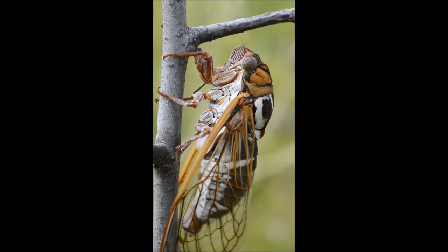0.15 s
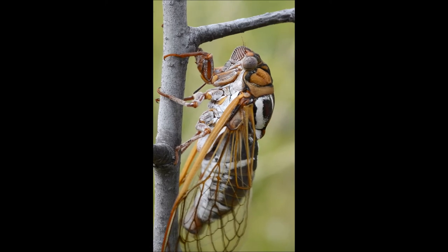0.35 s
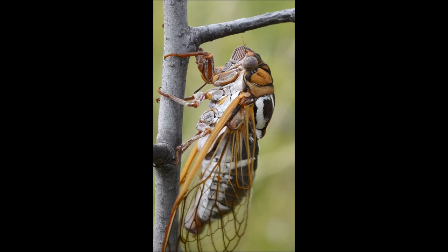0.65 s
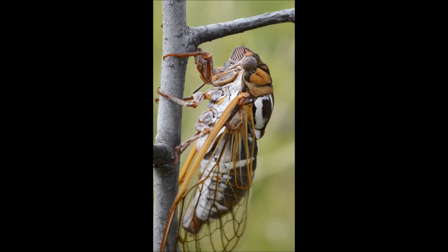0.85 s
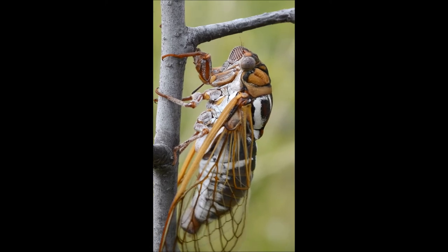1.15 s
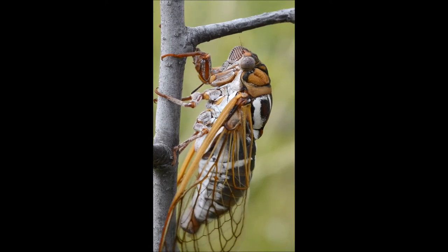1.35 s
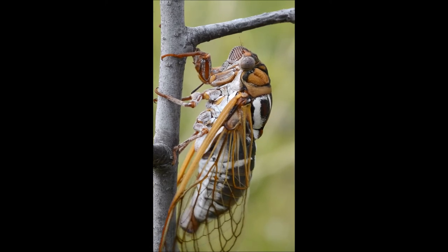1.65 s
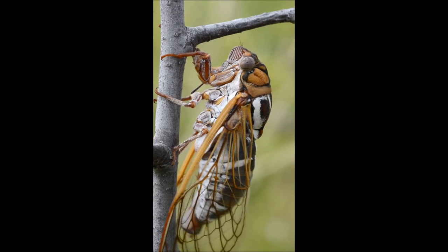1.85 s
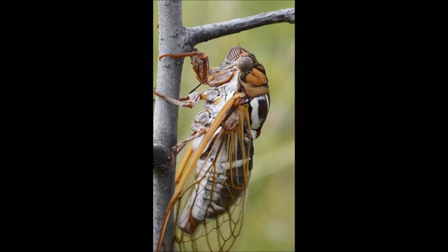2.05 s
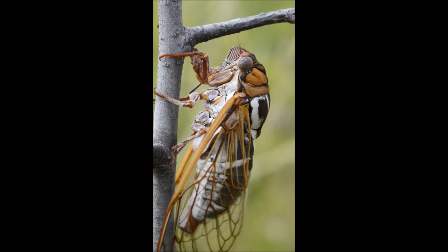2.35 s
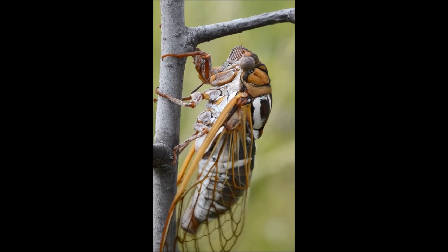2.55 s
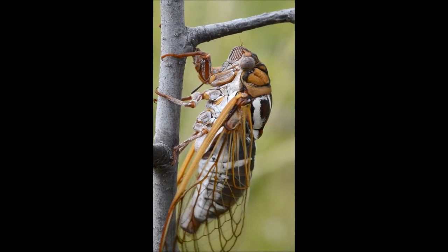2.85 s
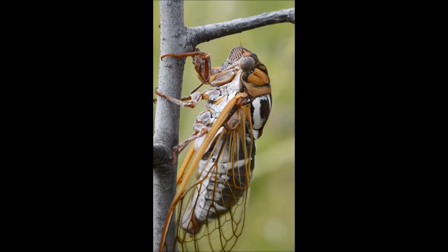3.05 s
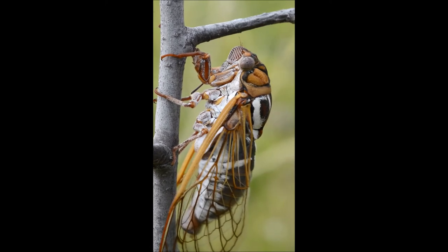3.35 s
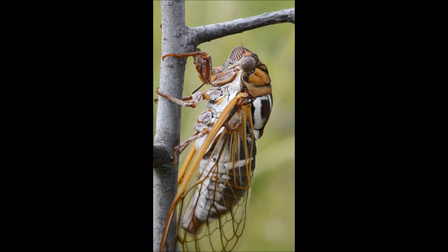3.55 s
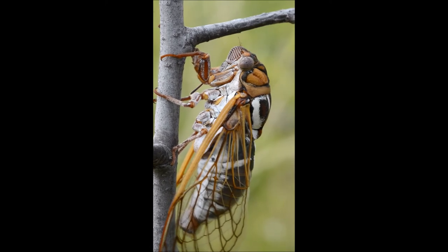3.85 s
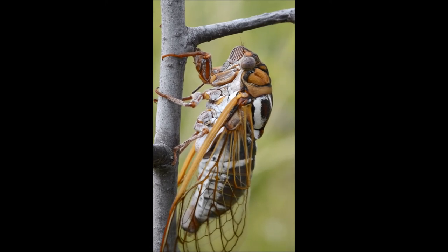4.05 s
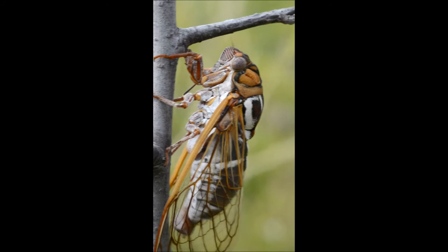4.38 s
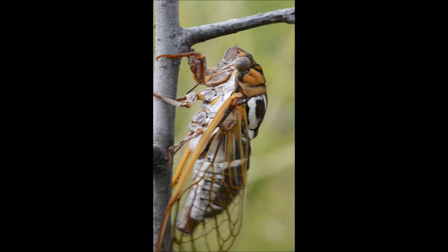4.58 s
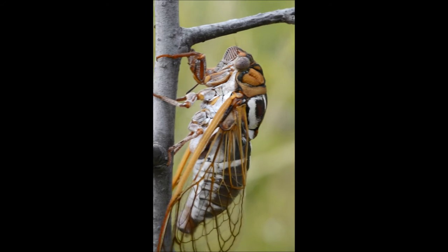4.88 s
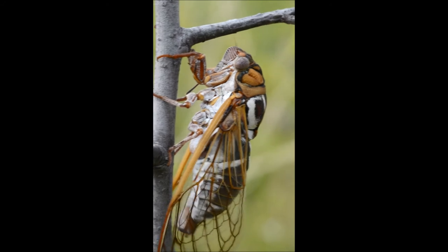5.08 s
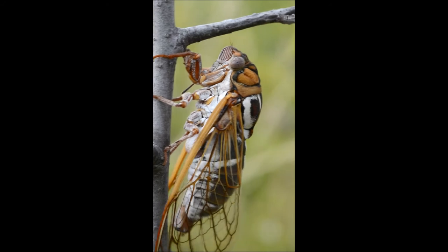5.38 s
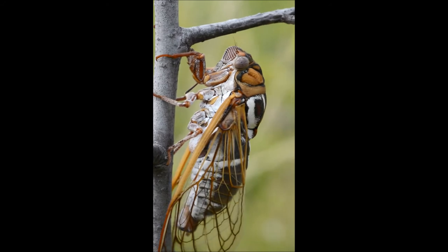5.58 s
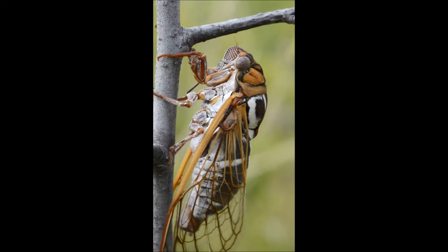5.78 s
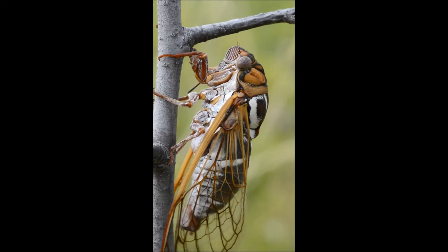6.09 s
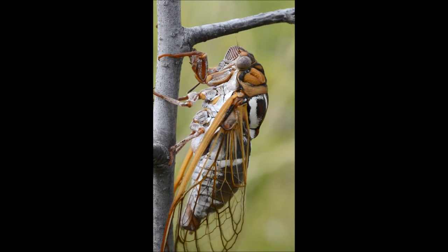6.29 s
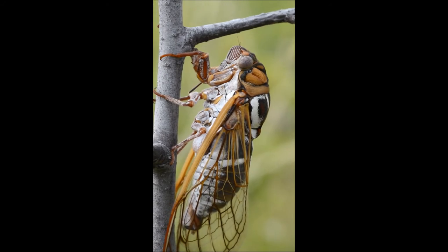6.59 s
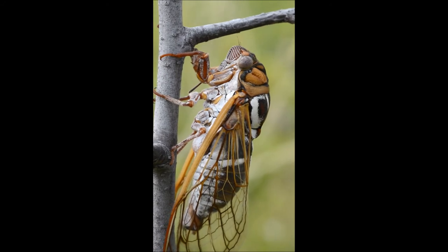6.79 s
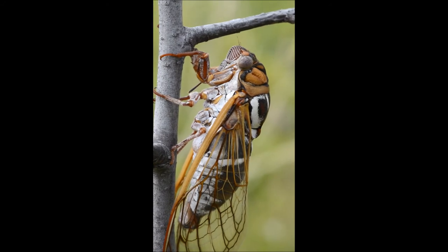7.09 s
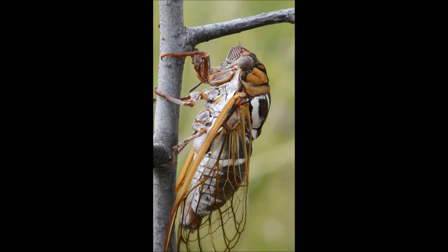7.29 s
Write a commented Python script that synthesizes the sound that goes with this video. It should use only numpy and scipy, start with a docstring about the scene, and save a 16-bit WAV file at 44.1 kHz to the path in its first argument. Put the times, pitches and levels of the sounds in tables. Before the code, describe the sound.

From the first instant a cicada very near the microphone, a little left of centre, sings a loud, piercing, dry buzz of dense tiny clicks, brightest around four to eight kilohertz with crisp snaps above. It throbs about sixteen or seventeen times a second, each pulse harder, louder and mostly higher, some snaps slightly overloaded. This holds almost unchanged until about 4.9 seconds. From 5 to 6 seconds the throbs weaken and disappear, leaving a more even, lower-energy buzz. From 6 to 6.9 seconds it slows, softens and grows looser and raspier, then stops suddenly, followed by two loose clicks at about 6.9 seconds. A second cicada, fainter and hissier, throbs steadily farther off throughout and is now exposed until the end. Leaves give a very short diffuse scatter; the still air is nearly silent, with a faint low hum and one tiny soft blip near 7.4 seconds.

```python
"""A loud, throbbing buzz is heard first: a cicada on a twig close by; a second one throbs farther off.
The near one's two ribbed tymbals (drum skins) buckle in turn, three clicks each. Its abdomen lifts about
16 times a second, which slows the stroke and makes the clicks louder and mostly higher.
Then the throbs die out, the muscles tire, and the song stops with two loose clicks.
The far one is a filtered train of uneven clicks with noise; leaves scatter the sound, over still air."""
import sys
import numpy as np
from scipy import signal
from scipy.io import wavfile

SR = 44100
rng = np.random.default_rng(int(sys.argv[2]) if len(sys.argv) > 2 else 0)


def dump_mix(stems):
    """Bounce the given channels to the path in sys.argv[1] as a 16-bit WAV at rate SR."""
    frames = np.atleast_2d(stems).T  # one column per channel
    limited = np.clip(frames, -1, 1)  # hard clip at full scale
    pcm = np.round(limited * 32767).astype(np.int16)
    wavfile.write(sys.argv[1], SR, pcm)


N = 327663
TIME = np.arange(N) / SR  # seconds


def gain_of(db):
    """Turns decibels into a gain."""
    return 10 ** (np.asarray(db) / 20)


def evened(x):
    """Scales a sound to an average (rms) strength of 1."""
    return x / np.sqrt(np.mean(x ** 2) + 1e-20)


def add(mix, start_s, sound):
    """Mixes a sound in at start_s, cutting off what runs past the end."""
    part = mix[max(round(start_s * SR), 0):][:len(sound)]
    part += sound[:len(part)]


def colour(x, points, size=2048):
    """Filters with a gain curve (pitch_hz, level_db); minimum phase, so nothing sounds before its cause."""
    pitch_hz, level_db = np.transpose(points)
    hz = abs(np.fft.fftfreq(size, 1 / SR))
    curve_db = np.interp(np.log(hz + 1), np.log(pitch_hz + 1), level_db)
    log_gain = np.log(gain_of(curve_db))
    taps = np.fft.ifft(np.exp(np.conj(signal.hilbert(log_gain)))).real
    return signal.oaconvolve(x, taps)[:N]


def resonate(x, pitch_hz, width_hz):
    """A fixed resonance, like air ringing in a hollow, with a gain of about 1 at its pitch."""
    r = np.exp(-np.pi * width_hz / SR)
    pole = r * np.exp(2j * np.pi * pitch_hz / SR)
    return 2 * signal.lfilter([1 - r], [1, -pole], x).real


def scatter(x, t60, size=256):
    """A cloud of ever-changing small reflections, as loud as the sound itself, dying 60 dB in t60 seconds."""
    hop = size // 4
    z = signal.stft(x, nperseg=size, noverlap=size - hop)[2]
    keep = np.exp(-2 * np.log(1000) * hop / SR / t60)  # share of the power left after one hop
    power = signal.lfilter([0, 1 - keep], [1, -keep], abs(z) ** 2)
    cloud = np.sqrt(power) * np.exp(2j * np.pi * rng.random(z.shape))
    reflections = signal.istft(cloud, nperseg=size, noverlap=size - hop)[1][:N]
    return np.std(x) * evened(reflections)


def burst(t, pitch_hz, swell_s):
    """A few cycles that swell quickly, peak at swell_s, and die away."""
    age = np.maximum(t, 0) / swell_s
    return age * np.exp(1 - age) * np.sin(2 * np.pi * pitch_hz * t)


def cycles(rate):
    """Counts the cycles gone by at each moment, for a pace curve (time_s, cycles_per_s)."""
    return np.cumsum(np.interp(TIME, *np.transpose(rate))) / SR


# Colour of the still air: pitch_hz, level_db (relative)
AIR_COLOUR = [(20, -20), (60, -12), (100, 4), (140, -7), (300, -2), (700, -2), (1400, -3), (3000, -10),
              (16000, -30)]


def outdoors(air_db=-65, blip_db=-42, blip_hz=910, blip_s=0.0018):
    """Still air with a low hum, made of filtered noise, and one soft short blip near the end."""
    out = gain_of(air_db) * evened(colour(rng.standard_normal(N), AIR_COLOUR))
    add(out, 7.391, gain_of(blip_db) * burst(TIME[:SR // 20], blip_hz, blip_s))
    return out


# Colour of the far cicada: pitch_hz, level_db (relative)
FAR_COLOUR = [(1200, -54), (2200, -35), (3000, -31), (3500, -22), (4000, -9), (4850, 0), (5900, 1),
              (6900, -3.5), (7700, -16), (8300, -12), (9200, -20), (11500, -17), (13400, -25), (15600, -27)]


def far_cicada(level_db=-26, throb_db=0.5, bright_db=2.0, clicks_per_s=620, unevenness=1.6, wash_db=1):
    """A filtered train of randomly uneven clicks with noise; its 6.3-8 kHz band swells with each throb."""
    throb = np.cos(2 * np.pi * (TIME - 7.1) / .0605)  # one throb every 0.0605 s
    uneven_pace = clicks_per_s * (1 + unevenness * rng.standard_normal(N))
    click_count = np.floor(np.cumsum(uneven_pace) / SR)
    # a click each time the count reaches a new high
    clicks = np.diff(np.maximum.accumulate(click_count), prepend=0) * rng.uniform(0.33, 1, N)
    wash = gain_of(wash_db) * rng.standard_normal(N)
    buzz = colour(evened(clicks) + wash, FAR_COLOUR)
    upper_band = signal.butter(2, [6300, 8000], "band", fs=SR, output="sos")
    bright = signal.sosfiltfilt(upper_band, buzz)
    rest = buzz - bright
    song = rest * gain_of(throb_db * throb) + bright * gain_of(bright_db * throb)
    return gain_of(level_db) * evened(song)


# Colour of the sound that the leaves throw back: pitch_hz, level_db
LEAF_COLOUR = [(1500, -25), (3200, -15), (4000, -9.5), (7000, -9.5), (12000, -16)]


def leaf_echo(near):
    """Leaves around the near cicada throw its song back as a cloud of small reflections."""
    return colour(scatter(near, t60=.03), LEAF_COLOUR)


# Twigs and leaves reach the two microphone ports differently: pitch_hz, side_level_db
SIDE_COLOUR = [(1000, -23), (2800, -65), (3700, -17.5), (4500, -20.5), (6000, -19.5), (8500, -12.5),
               (12000, -12.5), (15000, -2.5)]


def left_right_difference(mid, near):
    """Very short reflections that differ between left and right; the near singer is a little to the left."""
    return colour(scatter(mid, t60=.003), SIDE_COLOUR) + gain_of(-29) * near


# Pace of the abdomen: time_s, throbs_per_s
THROB_PACE = [(0, 17.07), (1.3, 16.59), (2.2, 16.77), (3.2, 16.44), (3.9, 16.62), (4.9, 15.86),
              (5.9, 12.35)]
# How high the abdomen lifts in a throb, before chance variation: time_s, height (0-1)
LIFT_HEIGHT = [(0, 0.95), (2.8, 0.88), (4.2, 0.92), (4.6, .94), (5.15, 0.78), (5.4, .33), (5.7, .3),
               (5.8, 0.59), (6, 0.02)]
# Strokes hurry ahead before each lift and fall behind during it, in proportion to its height:
# place (share of the throb, from its top), lag (strokes at full height)
LAG_IN_THROB = [(-.26, -.1), (.47, .31)]


def abdomen(first_throb_s=.011, rise=.27, fall=.225, flatness=2.8, spread=0.034):
    """One rounded lift in every throb: its height, and the lag that it gives the strokes."""
    # rise and fall are shares of the throb; spread is the chance variation of the height
    throbs = cycles(THROB_PACE)
    throbs = throbs - np.interp(first_throb_s, TIME, throbs)
    nearest = np.round(throbs).astype(int)
    height = np.interp(TIME, *np.transpose(LIFT_HEIGHT))
    chance = 1 + spread * rng.standard_normal(nearest[-1] + 1)[nearest]
    width = np.where(throbs < nearest, rise, fall)
    lift = height * chance * np.exp(-abs((throbs - nearest) / width) ** flatness)
    lag = height * np.interp(throbs, *np.transpose(LAG_IN_THROB), period=1)
    return lift, lag


# Pace of the tymbal muscles, before the lag: time_s, strokes_per_s
STROKE_PACE = [(0, 103.6), (0.7, 102.54), (1.15, 102.97), (2, 102.19), (3, 101.83), (3.6, 100.49),
               (4.3, 99.75), (4.85, 96.39), (5.1, 96.84), (5.5, 90.05), (6.1, 85.17), (6.62, 79.97),
               (6.88, 69.79)]
LAST_STROKE_S = 6.8838
# The muscles tire: time_s, fatigue (0-1), effort_db
MUSCLE_TIRING = [(0, 0.03, 2), (4.5, 0.13, 1.5), (5.099, 0.3, 2), (5.401, 0.7, 0.95), (6, .94, 0.47),
                 (6.5, 1, -0.4), (6.881, 0.98, -1.1)]
# Three ribs of one tymbal, then of the other, before chance variation; levels are relative.
# Each of the next three: place (share of the stroke), pitch_hz, ring_db, crack_db
SLACK_RIBS = [(0, 5080, 0.5, 4), (.25, 4690, -3.1, -6), (0.371, 5200, -3, -39), (0.502, 5360, 3, -2.5),
              (0.742, 4660, -1, -8), (0.871, 5070, -2, -23)]  # abdomen down
TAUT_RIBS = [(0, 7050, 3.16, 9), (0.121, 5836, 6.4, 7), (0.262, 4075, 2.5, 13), (0.681, 6870, 4.1, -1.5),
             (.8, 5790, 6.4, 1.5), (0.952, 4130, 2.63, 9)]  # abdomen lifted
TIRED_RIBS = [(-.03, 5160, 0, 4.5), (0.148, 3470, -8, 0.5), (0.299, 5060, 0.5, -27),
              (0.499, 5330, 3.5, 0.5), (.67, 4150, -7, -6), (.81, 5350, 5, -12)]  # muscles tired
# Loose clicks as the tymbals settle, levels relative: start_s, pitch_hz, ring_db, crack_db
SETTLING_CLICKS = [(6.8955, 5000, -3, -5), (6.9365, 5000, -1.5, -2)]


def rib_clicks(jitter_s=.00005, pitch_spread=0.029, spread_db=0.28):
    """Each stroke buckles six ribs; gives one row (start_s, pitch_hz, ring_db, crack_db) for every click."""
    when, fatigue, effort_db = np.transpose(MUSCLE_TIRING)
    lift, lag = abdomen()
    strokes = cycles(STROKE_PACE) - lag
    count = np.arange(np.interp(LAST_STROKE_S, TIME, strokes))
    rows = []
    for slack, taut, tired in zip(*map(np.array, (SLACK_RIBS, TAUT_RIBS, TIRED_RIBS))):
        start_s = np.interp(count + slack[0], strokes, TIME)  # first guess, to look up the tension
        worn = np.clip(np.interp(start_s, when, fatigue), 0, 1)[:, None]
        tension = np.interp(start_s, TIME, lift)[:, None]
        # tiring changes the slack rib; lifting the abdomen blends it into the taut one
        relaxed = (1 - worn) * slack + worn * tired
        share, pitch_hz, ring_db, crack_db = ((1 - tension) * relaxed + tension * taut).T
        # small chance differences from click to click
        early, sharp, hard, brittle = rng.standard_normal((len(count), 4)).T
        start_s = np.interp(count + share, strokes, TIME) + jitter_s * early
        pitch_hz = pitch_hz * (1 + pitch_spread * sharp)
        force_db = np.interp(start_s, when, effort_db) + spread_db * hard
        ring_db = ring_db + force_db
        crack_db = crack_db + force_db + spread_db * brittle
        rows.append(np.transpose([start_s, pitch_hz, ring_db, crack_db]))
    rows = np.vstack(rows)
    in_song = (rows[:, 0] > 0) & (rows[:, 0] < LAST_STROKE_S)
    return np.vstack([rows[in_song], SETTLING_CLICKS])


# How well the body radiates the rings: pitch_hz, level_db
RING_COLOUR = [(200, -67.5), (1200, -48.5), (2000, -4), (2900, -9.5), (3600, 4.5), (4500, -2.5), (5200, -4),
               (6000, -1.5), (7200, -1), (9000, -4.5), (16000, -15.5)]
# Colour of the cracks: pitch_hz, level_db
CRACK_COLOUR = [(200, -79), (1200, -19.5), (2000, -14), (2700, -2.5), (4000, 1.5), (7000, 5), (8200, 7.5),
                (9000, 4), (10200, 2), (11300, 1.5), (13300, -1), (14300, -5), (15600, -1)]
# The last strokes lose their tension: time_s, looseness (0-1)
TYMBAL_LOOSENESS = [(6.3, 0), (6.65, 0.49), (6.8, 0.64), (6.88, 0.6), (6.93, 0.6)]
# Dull rasp of slackening tymbals: pitch_hz, level_db
LOOSE_COLOUR = [(120, -31), (300, -21), (1200, -7.5), (2300, 5), (4000, -28), (16000, -25)]
# Resonances of the air sac and eardrums: pitch_hz, width_hz, level_db
BODY_RESONANCES = [(4110, 146, -1.5), (4490, 159, 5), (5894, 257, -2.5), (11430, 890, -9.5)]


def near_cicada(ring_db=-10, crack_db=-14, grit_db=-16, swell_s=0.0002381, crack_swell_s=.00007,
                crack_hz=12500, grit_s=0.0048, size=256):
    """Each rib cracks in a high mode, rings in a low one and rasps a little; the hollow body rings on."""
    rings, cracks = np.zeros(N), np.zeros(N)
    for start_s, pitch_hz, rib_db, snap_db in rib_clicks():
        t = TIME[:size] + round(start_s * SR) / SR - start_s  # keeps timing finer than one sample
        grit_gain = gain_of(grit_db + (rib_db + snap_db) / 2)
        grit = grit_gain * np.exp(-t / grit_s) * rng.standard_normal(size)
        snap = gain_of(snap_db) * burst(t - swell_s / 2, crack_hz, crack_swell_s)
        add(rings, start_s, gain_of(rib_db) * burst(t, pitch_hz, swell_s))
        add(cracks, start_s, snap + grit)
    looseness = np.interp(TIME, *np.transpose(TYMBAL_LOOSENESS))
    rasp = colour(cracks * looseness, LOOSE_COLOUR)
    song = gain_of(ring_db) * colour(rings, RING_COLOUR)
    song += gain_of(crack_db) * (colour(cracks, CRACK_COLOUR) + rasp)
    body = sum(gain_of(db) * resonate(song, hz, width_hz) for hz, width_hz, db in BODY_RESONANCES)
    return song + body


def scene():
    """Both singers among leaves in still air, the near one a little to the left."""
    near = near_cicada()
    mid = near + leaf_echo(near) + far_cicada() + outdoors()
    side = left_right_difference(mid, near)
    return np.array([mid + side, mid - side])


def record(dry, knee=5.6, edge_hz=15780):
    """The hardest snaps overload both channels together, leaving soft low ticks; then the top is cut."""
    clipped = dry / (1 + abs(dry).max(0) ** knee) ** (1 / knee)
    low_pass = signal.firwin(511, edge_hz, window=("kaiser", 9), fs=SR)
    return signal.oaconvolve(clipped, low_pass[None], "same")


dry = scene()
out = record(dry)
dump_mix(out)
```